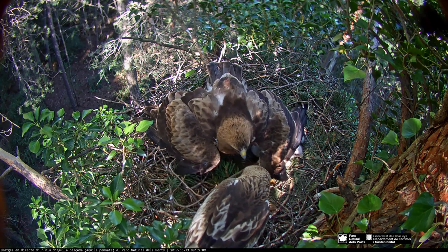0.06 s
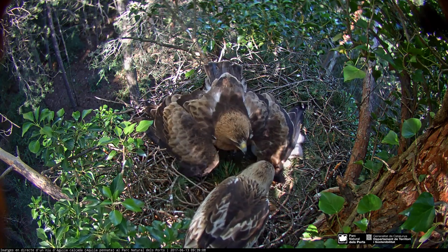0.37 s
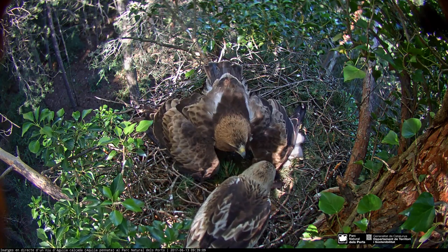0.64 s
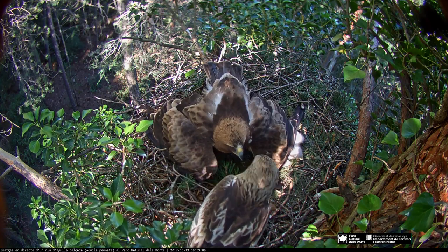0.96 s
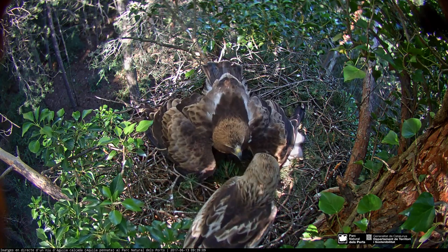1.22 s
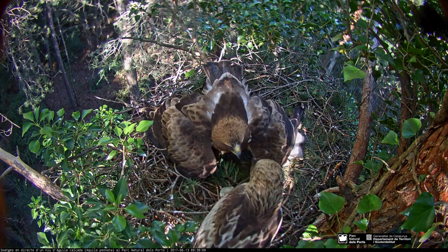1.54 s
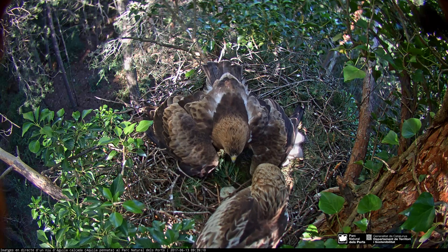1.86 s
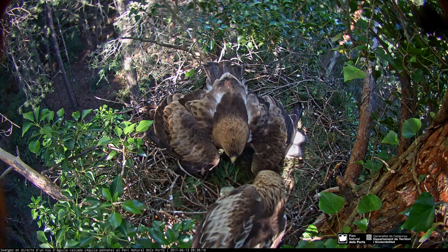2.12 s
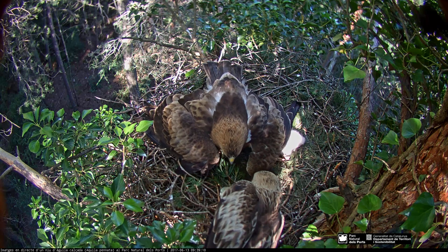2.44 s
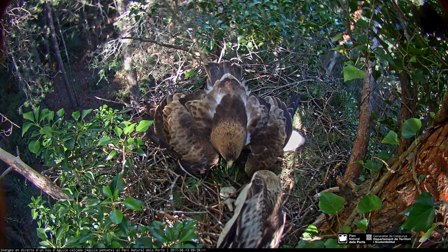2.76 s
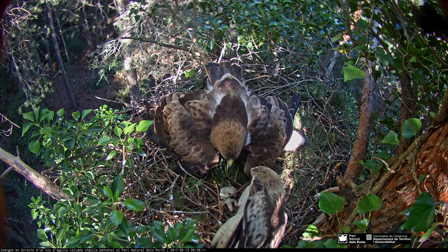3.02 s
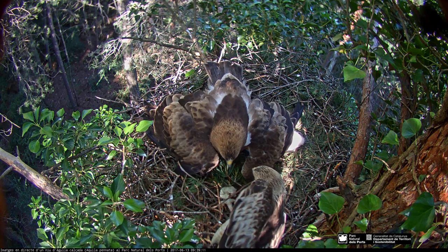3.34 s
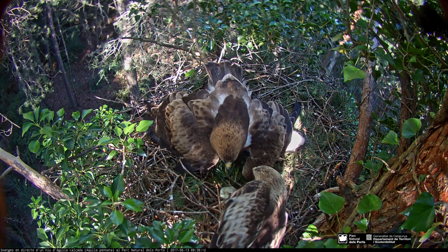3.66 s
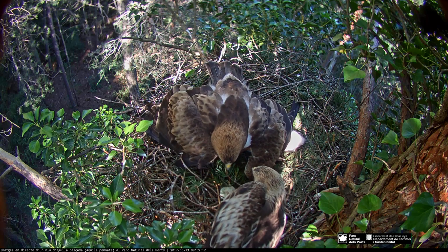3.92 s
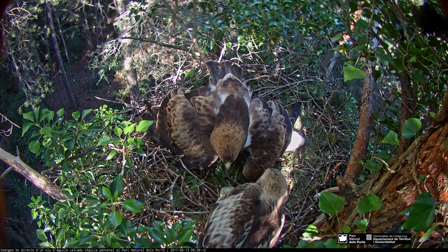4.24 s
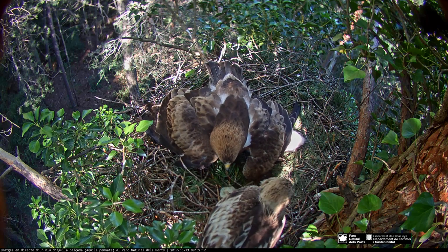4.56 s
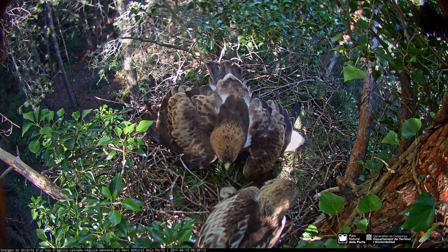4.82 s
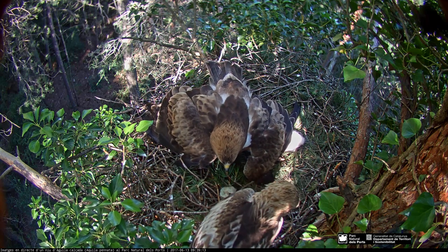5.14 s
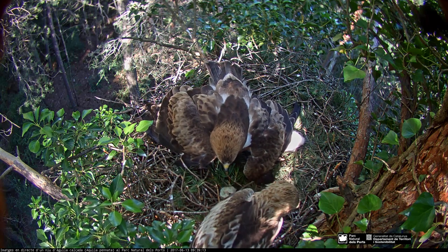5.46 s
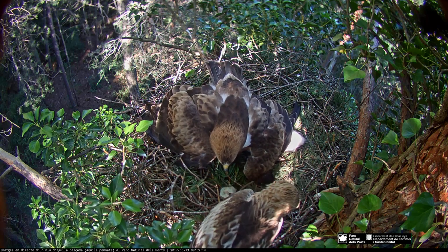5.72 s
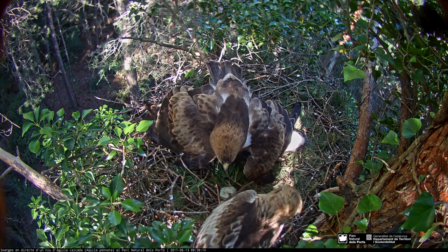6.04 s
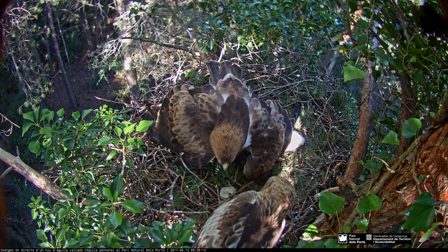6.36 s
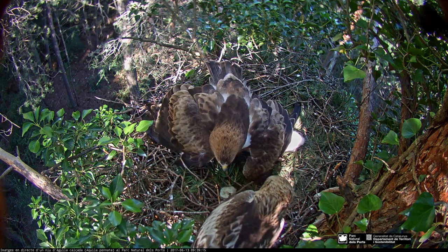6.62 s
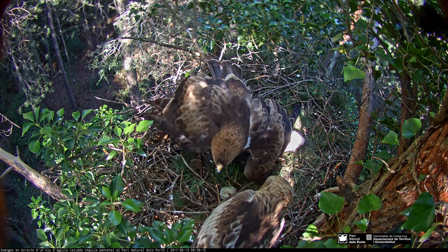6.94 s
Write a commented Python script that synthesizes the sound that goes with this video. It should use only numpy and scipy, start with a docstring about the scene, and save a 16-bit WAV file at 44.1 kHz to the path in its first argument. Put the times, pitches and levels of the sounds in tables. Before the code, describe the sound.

An eagle screams over and over at close range, shrill raspy whistles each ending in a short yelp, over still forest air.

```python
"""An eagle screams repeatedly on its nest in a wood, close to a mono microphone.
Each scream is a rising whistle of the syrinx: it splits into undertones (period doubling) or breaks
into rasp (chaotic vibration), then dives and flips into a low yelp. Pushes of air make two early
screams flutter; the loudest peaks overload the input. Behind: thin far whistles, faint echo, still air."""
import sys
import numpy as np
from scipy import signal
from scipy.fft import rfft, irfft, next_fast_len
from scipy.io import wavfile
from scipy.ndimage import uniform_filter1d

SR = 44100
rng = np.random.default_rng(int(sys.argv[2]) if len(sys.argv) > 2 else 0)


def wav_out(sig):
    """Save sig, one row per channel (or a flat mono array), as 16-bit PCM at SR to the path in sys.argv[1]."""
    wavfile.write(sys.argv[1], SR, np.round(np.clip(np.atleast_2d(sig).T, -1, 1) * 32767).astype(np.int16))


N = 307804
T = np.arange(N) / SR

# still forest air: (f/Hz, relative density/dB)
AIR = [(20, -0.5), (45, -4), (90, -12.5), (170, -19), (350, -20.5), (800, -24), (1500, -24), (3000, -24),
       (5500, -19), (8000, -34)]
# far whistles: (top t/s, rise/s, level/dB)
FAR_WHISTLES = [(2.17, .08, -58.5), (2.575, 0.046, -57), (3.968, 0.068, -50), (4.328, .035, -48.5),
                (5.815, 0.088, -51), (6.182, 0.0547, -47.5)]
# nest rim and trunk: (delay/s, level/dB)
REFLECTIONS = [(.00131, -17.5), (.00291, -26.5), (.00521, -21.5)]
# response of throat and open beak: (f/Hz, gain/dB)
THROAT = [(1000, -32), (2000, -24.5), (2700, -18), (3200, -10.5), (3800, -6), (4500, -2), (5300, 1.33),
          (6200, -6.5), (7000, -9), (7800, -10.5), (8600, -35)]
# yelps after the dives: (t/s, length/s, f/Hz, level/dB)
YELPS = [(0.489, 0.024, 2030, -11), (1.045, 0.036, 2069, -8.5), (1.577, 0.033, 2054, -9.5),
         (2.019, 0.027, 2129, -13.5), (2.501, 0.028, 2085, -13.5), (2.92, 0.045, 2188, -11),
         (3.374, 0.031, 2164, -13), (3.822, 0.027, 2165, -12), (4.268, 0.025, 2128, -13.5),
         (4.696, 0.025, 2160, -12.5), (5.126, 0.03, 2110, -12.5), (5.605, 0.04, 2138, -12),
         (6.061, 0.057, 2127, -11.5), (6.578, 0.032, 2136, -12)]
# short flat peeps of a chick nearby: (t/s, length/s, f/Hz, level/dB)
PEEPS = [(1.997, 0.029, 2220, -37), (2.114, 0.0077, 2350, -53), (3.914, 0.019, 2287, -33.5)]
# low-voice partials: (harmonic number, gain/dB)
YELP_PARTIALS = [(1, -11.5), (2, -0.7), (3, -19), (4, -48.5)]
PEEP_PARTIALS = [(1, 5.3), (2, 3)]
# screams: (t/s, clean opening/s, climb start f/Hz, climb end f/Hz, arch (> 0 climbs early),
# opening level/dB, whistle level/dB, rasp level at break/dB, rasp level at end/dB)
SCREAMS = [(0.094, 0.12, 4560, 6084, 1.52, -29, -17, -26, -19.5),
           (0.646, .011, 5233, 5896, -0.165, -15, -28, -20, -15),
           (1.207, .011, 5000, 5816, -0.12, -20, -38.5, -20.5, -21),
           (1.735, .011, 5150, 5728, -0.8, -18.5, -36.5, -25, -24.5),
           (2.178, .012, 5086, 5672, 0.5, -18, -27.5, -23, -23),
           (2.658, .012, 4989, 6070, -0.041, -19.5, -29, -25, -23.5),
           (3.094, .015, 4880, 5884, 0.049, -23, -25.5, -27, -31),
           (3.528, .019, 4617, 6140, 0.46, -22, -22.5, -25, -34),
           (3.98, 0.024, 4641, 6290, -0.96, -24.5, -26.5, -26, -30.5),
           (4.416, 0.019, 4680, 6312, 0.37, -21.5, -24.5, -29, -32.5),
           (4.853, 0.026, 4400, 5767, 0.7, -23, -24, -31.5, -44),
           (5.307, .038, 4440, 6120, -1.19, -28, -27, -47.5, -39.5),
           (5.786, .038, 4350, 5770, -0.8, -23.5, -27, -40, -43),
           (6.272, .047, 4280, 5770, -0.95, -23.5, -27, -50, -29.5),
           (6.744, 0.038, 4400, 6210, 1.6, -25, -28.5, -27.5, -25)]
# closing dive of each scream: (end t/s, level/dB)
DIVES = [(0.487, -1.5), (1.044, -3), (1.577, -6.5), (2.019, -8), (2.501, -11.5), (2.92, -5), (3.365, -10),
         (3.798, -8.5), (4.252, -4), (4.679, -4.5), (5.111, -11.5), (5.596, -11.5), (6.06, -17),
         (6.564, -13), (7.1, -17)]
# clear, loud swells: (middle t/s, half length/s, f/Hz, level/dB)
SWELLS = [(0.432, .012, 5700, -13), (0.458, .014, 5600, -12), (0.981, 0.004, 5750, -4.5),
          (1.002, .010, 5280, -7.5), (1.017, .008, 5650, -6), (1.556, .007, 5650, -7),
          (1.976, .012, 5450, -12.5), (1.998, 0.00945, 5500, -20.5), (2.479, 0.0077, 5150, -7.5),
          (3.312, .016, 5500, -19), (3.733, 0.0077, 5650, -13.5), (4.218, .008, 5382, -18),
          (4.566, 0.01054, 5650, -21.5), (4.621, 0.012, 5640, -16.5), (5.074, .012, 5500, -22.5)]
# pushes of air: (t/s, length/s, middle f/Hz, level/dB)
PUSHES = [(0.761, 0.038, 5430.0, -8.5), (0.806, 0.034, 5640.0, -9), (0.841, 0.04264, 5850.0, -6),
          (0.885, 0.041, 5770.0, -2.5), (0.929, 0.036, 5770.0, -3), (1.232, 0.047, 5040, -13),
          (1.274, 0.036, 5170.0, -8.5), (1.323, 0.031, 4820.0, -8), (1.369, 0.038, 5340.0, -9),
          (1.416, 0.033, 5380.0, -7.5), (1.459, 0.033, 5680.0, -4), (1.504, 0.041, 5600.0, -7.5)]
# period doubling: (start t/s, end t/s, undertone level/dB)
DOUBLINGS = [(0.139, 0.299, -29.5), (4.975, 5.068, -30), (5.396, 5.521, -30.5), (5.83, 6.023, -32),
             (6.361, 6.513, -31.5)]
# slips into the low register, also period-doubled: (start t/s, end t/s, level/dB)
SLIPS = [(0.678, 0.692, -23.5), (1.770, 1.784, -26), (2.222, 2.24, -27), (2.705, 2.72, -24),
         (3.144, 3.172, -27), (3.549, 3.592, -26.5), (4.003, 4.04, -29), (4.443, 4.512, -26.5),
         (4.897, 4.969, -26.5)]
# second tone below the whistle: (start t/s, end t/s, start f/Hz, level/dB)
SIDE_TONES = [(0.107, 0.157, 3295, -41.5), (0.343, 0.404, 3790, -30), (0.417, 0.475, 4533, -16.5),
              (1.837, 1.904, 3700, -28.5), (2.355, 2.457, 3746, -26), (2.839, 2.878, 3826, -30),
              (3.288, 3.331, 3680, -31.5), (3.677, 3.776, 3800, -30.5), (4.14, 4.231, 3734, -30),
              (4.554, 4.6, 3606, -35), (4.601, 4.662, 4044, -27), (5.057, 5.086, 3940, -28.5),
              (6.918, 6.988, 3900, -36.5)]
# overload crackle: (f/Hz, relative density/dB)
CRACKLE = [(20, -3.5), (100, -1), (250, -3.5), (900, -12.5), (1600, -11), (4000, -37)]


def from_db(db):
    """Decibels to gain."""
    return np.exp(np.asarray(db) * (np.log(10) / 20))


def rms_one(x):
    """Scale to rms 1."""
    return x / np.sqrt(np.mean(x ** 2) + 1e-20)


def gain_at(spectrum, hz):
    """Spectrum gain, interpolated over log frequency."""
    points_hz, db = np.transpose(spectrum)
    return from_db(np.interp(np.log(np.maximum(hz, 1)), np.log(points_hz), db))


def noise(spectrum):
    """Coloured noise, rms 1."""
    size = next_fast_len(N)
    white = rfft(rng.standard_normal(size))
    return rms_one(irfft(white * gain_at(spectrum, np.fft.rfftfreq(size, 1 / SR)), size)[:N])


def drift(rate_hz):
    """Smooth random wander, rms 1."""
    coarse_s = np.arange(0, N + 8, 8) / SR
    lowpass = signal.butter(2, rate_hz, fs=SR / 8, output="sos")
    wander = signal.sosfilt(lowpass, rng.standard_normal(len(coarse_s)))
    return np.interp(T, coarse_s, rms_one(wander))


def gate(t, start, end, edge_s):
    """Unit window, edges rounded inward."""
    return np.sin(np.pi / 2 * np.clip(np.minimum(t - start, end - t) / edge_s, 0, 1)) ** 2


def bell(t, middle, width_s):
    """Gaussian, height 1."""
    return np.exp(-((t - middle) / width_s) ** 2)


def during(start_s, end_s):
    """Sample slice of a time span."""
    return slice(max(int(start_s * SR), 0), int(end_s * SR))


def sine(hz):
    """Sine along a pitch curve, rms 1."""
    return np.sqrt(2) * np.sin(2 * np.pi * np.cumsum(hz) / SR)


def butter(x, order, hz, kind="low"):
    """Butterworth filter."""
    return signal.sosfilt(signal.butter(order, hz, kind, fs=SR, output="sos"), x)


def band_limit(x, hz):
    """Steep elliptic low-pass."""
    return signal.sosfilt(signal.ellip(10, .1, 80, hz, fs=SR, output="sos"), x)


def air(level_db=-56.5):
    """Still forest air: steady, bass-heavy noise."""
    return from_db(level_db) * noise(AIR)


def far_whistles(top_hz=6380, rise_hz_per_s=14000, fall_hz_per_s=48000, fall_s=.072):
    """Faint whistles: slow rise, fast fall."""
    out, waver = np.zeros(N), 1 + .0072 * drift(120)
    for top, rise_s, db in FAR_WHISTLES:
        at = during(top - rise_s, top + fall_s)
        t = T[at]
        hz = top_hz - np.maximum(rise_hz_per_s * (top - t), fall_hz_per_s * (t - top))
        out[at] += sine(hz * waver[at]) * from_db(db) * gate(t, top - rise_s, top + fall_s, .018)
    return out


def forest_echo(x, level_db=-28.5, t60_s=.27, build_s=.0042, dull_hz=5500):
    """Trunks and leaves scatter a thin, dull tail."""
    t = T[:SR]
    tail = rng.standard_normal(SR) * from_db(-60 * t / t60_s) * (1 - np.exp(-t / build_s))
    tail = butter(tail / np.sqrt(np.sum(tail ** 2)), 3, dull_hz)
    return from_db(level_db) * signal.fftconvolve(x, tail)[:N]


def nest(x):
    """Direct sound plus close reflections: level ripples as pitch sweeps."""
    return x + sum(from_db(db) * np.interp(T - round(delay_s * SR) / SR, T, x)
                   for delay_s, db in REFLECTIONS)


def low_notes(notes, partials, fall, fade_db, edge_s, waver):
    """Harmonic notes; pitch and level sag as pressure runs out."""
    out, unsteady = np.zeros(N), 1 + waver * drift(180)
    for start, length, hz, db in notes:
        at = during(start, start + length + edge_s)
        u = np.clip((T[at] - start) / length, 0, None)
        pitch_hz = hz * (1 - fall * np.minimum(u, 1) ** 2.6) * unsteady[at]
        level = from_db(db + fade_db * u ** 5) * gate(T[at], start, start + length + edge_s, edge_s)
        out[at] += level * sum(from_db(part_db) * sine(k * pitch_hz) for k, part_db in partials)
    return out


def bridge_notes(hz=2945, level_db=-24.5, shortest_s=.008):
    """Flat notes from a dive to a late yelp; columns as PEEPS."""
    gaps = [(dive[0], yelp[0] - dive[0]) for dive, yelp in zip(DIVES, YELPS)]
    return [(start, length, hz, level_db) for start, length in gaps if length > shortest_s]


def squeaks(hz=5320, level_db=-14.5, width_s=.0029):
    """Squeak as a bridge note flips into the yelp."""
    out = np.zeros(N)
    for start, length, _, _ in bridge_notes():
        at = during(start, start + 2 * length)
        out[at] += from_db(level_db) * sine(np.full_like(T[at], hz)) * bell(T[at], start + length, width_s)
    return out


def side_tones(pitch_hz, rise_hz_per_s=6000, image_db=-6):
    """A rising lower tone beats with the whistle; a weaker image lies as far above."""
    out = np.zeros(N)
    waver, shimmer = 1 + .02 * drift(140), from_db(.3 * drift(78))
    for start, end, first_hz, db in SIDE_TONES:
        at = during(start, end)
        lower_hz = (first_hz + rise_hz_per_s * (T[at] - start)) * waver[at]
        upper_hz = 2 * pitch_hz[at] - lower_hz
        pair = sine(lower_hz) + from_db(image_db) * sine(upper_hz) * gain_at(THROAT, upper_hz)
        out[at] += from_db(db) * pair * shimmer[at] * gate(T[at], start, end, .0021)
    return out


def cracks(register_db=-29, split_db=-36):
    """Rasp gain: the voice cracks at changes of vibration mode."""
    moments = [(row[0], register_db) for row in YELPS]
    moments += [(t, split_db) for row in DOUBLINGS + SLIPS for t in row[:2]]
    level = np.zeros(N)
    for t, db in moments:
        at = during(t - .01, t + .01)
        level[at] += from_db(db) * bell(T[at], t, .0028)
    return level


def chaos(leap=.069, flicker_db=3.5, turbulence_db=-5, grain_db=-2.1):
    """Rasp, rms 1: three leaping, flickering tones over turbulence."""
    tones = 0
    for centre_hz in (4050, 5100, 6200):
        hz = centre_hz * np.exp(leap * drift(150) + .04 * drift(900))
        tones += sine(hz) * gain_at(THROAT, hz) * from_db(flicker_db * drift(180))
    turbulence = from_db(turbulence_db) * noise(THROAT)
    return rms_one((rms_one(tones) + turbulence) * from_db(grain_db * drift(180)))


def undertones(pitch_hz, slip_db=-1):
    """Period doubling: lines at 0.5 and 1.5 times the pitch, plus their gate."""
    level, doubled = np.zeros(N), np.zeros(N)
    for start, end, db in DOUBLINGS + [(start, end, db + slip_db) for start, end, db in SLIPS]:
        at = during(start, end)
        doubled[at] = gate(T[at], start, end, .003)
        level[at] = from_db(db) * doubled[at]
    lines = sum(sine(hz) * gain_at(THROAT, hz) for hz in (.5 * pitch_hz, 1.5 * pitch_hz))
    return level * lines, doubled


def slip(pitch_hz, whistle, low_hz=4160, rise_hz_per_s=3600):
    """Low register: the whistle drops to a slowly rising pitch. In place."""
    for start, end, db in SLIPS:
        at = during(start, end)
        held = gate(T[at], start, end, .002)
        pitch_hz[at] += (low_hz + rise_hz_per_s * (T[at] - start) - pitch_hz[at]) * held
        whistle[at] += (from_db(db) - whistle[at]) * held


def swell(pitch_hz, whistle, rasp, rasp_db=-4.5):
    """The whistle settles on one pitch and grows; rasp eases. In place."""
    for middle, width_s, hz, db in SWELLS:
        start, end = middle - 2 * width_s, middle + 2 * width_s
        at = during(start, end)
        hump = bell(T[at], middle, width_s)
        pitch_hz[at] += (hz - pitch_hz[at]) * gate(T[at], start, end, 2 * width_s)
        whistle[at] += from_db(db) * hump
        rasp[at] *= from_db(rasp_db * hump)


def flutter(pitch_hz, whistle, rasp, gap_db=-14, flank_db=-28, rasp_db=-15, split_db=-8, mirror_db=-18):
    """Air pushes arch, swell and split the whistle, in place. Returns a mirrored tone on the flanks."""
    pushing = np.zeros(N)
    for start, length, _, _ in PUSHES:
        span_s = start - .012, start + length + .012
        at = during(*span_s)
        pushing[at] += gate(T[at], *span_s, .008)
    rasp *= from_db(gap_db * np.minimum(pushing, 1))
    mirrored = np.zeros(N)
    for start, length, hz, db in PUSHES:
        at = during(start, start + length)
        u = np.abs(2 * (T[at] - start) / length - 1)   # 0 at the middle, 1 at the ends
        window = gate(T[at], start, start + length, .007)
        flanks = np.sin(np.pi * u) ** 2
        split = bell(T[at], start + .74 * length, .0013)
        pitch_hz[at] = hz * np.interp(u, [0, .2, .38, .42, .65, 1], [1, 1.01, 1.05, .95, .86, .6])
        whistle[at] += from_db(db + flank_db * u ** 2) * window * (1 - split)
        push_rasp = from_db(db + rasp_db) * window * (.25 + flanks) + from_db(db + split_db) * split
        rasp[at] = np.hypot(rasp[at], push_rasp)
        mirrored[at] = sine(hz * (1 + .36 * u ** 1.5)) * from_db(db + mirror_db) * flanks * window
    return mirrored


def scream_controls(rest_hz=3387, scoop_s=.0095, dive_s=.012, break_s=.0079,
                    crescendo_db=5, build_db=-27.5, hoarse_db=-30.5):
    """Pitch, whistle gain, rasp gain: clean scoop, break, climb, loud dive with a hoarse foot."""
    pitch_hz, whistle, rasp = np.full(N, float(rest_hz)), np.zeros(N), np.zeros(N)
    for scream, (end, dive_db) in zip(SCREAMS, DIVES):
        start, opening_s, first_hz, last_hz, arch, opening_db, whistle_db, *rasp_db = scream
        break_at = start + opening_s
        at = during(start, end)
        t = T[at]
        u = (t - start) / (end - start)
        climb_hz = first_hz + (last_hz - first_hz) * (u + arch * u * (1 - u))
        tension = (1 - np.exp((start - t) / scoop_s)) * (1 - np.exp((t - end) / dive_s))
        pitch_hz[at] = rest_hz + (climb_hz - rest_hz) * tension
        broken = np.clip((t - break_at) / break_s + .5, 0, 1)
        body = from_db(opening_db * (1 - broken) + (whistle_db + crescendo_db * u) * broken)
        build = from_db(build_db) * bell(t, end - .023, .0135)
        burst = from_db(dive_db) * bell(t, end - .0115, .006)
        whistle[at] = (body + build + burst) * gate(t, start, end, .0038)
        rasp[at] = from_db(np.interp(t, [break_at, end], rasp_db)) * broken * gate(t, start, end, .0088)
        rasp[at] += from_db(hoarse_db) * bell(t, end - .004, .003)
    return pitch_hz, whistle, rasp


def screams(stick_hz=46, spacing_hz=421, jitter=.0318, shimmer_db=2, octave_db=-33, doubled_rasp_db=-4):
    """The whistle staggers as rasp takes over; period doubling steadies it and eases the rasp."""
    pitch_hz, whistle, rasp = scream_controls()
    swell(pitch_hz, whistle, rasp)
    mirrored = flutter(pitch_hz, whistle, rasp)
    slip(pitch_hz, whistle)
    rough = rasp ** 2 / (rasp ** 2 + whistle ** 2 + 1e-12)
    wobble = (.002 + .022 * np.sqrt(rough)) * drift(45)
    pitch_hz *= 1 + wobble + .0091 * drift(140)
    pitch_hz += stick_hz * np.sin(2 * np.pi * pitch_hz / spacing_hz)   # clings to windpipe resonances
    halves, doubled = undertones(pitch_hz)
    stagger = .11 * rough ** 1.4 * drift(130) + jitter * rough * drift(750)
    unsteady_hz = pitch_hz * (1 + (1 - doubled) * stagger)
    dropouts_db = 5 * rough ** .6 * (1 - doubled) * (drift(90) - .9)
    flicker = from_db(shimmer_db * np.sqrt(rough) * drift(130) + dropouts_db)
    tone = whistle * flicker * (sine(unsteady_hz) + from_db(octave_db) * sine(2 * unsteady_hz))
    hoarse = (rasp * from_db(doubled_rasp_db * doubled) + cracks()) * chaos()
    return tone + hoarse + halves + mirrored + side_tones(pitch_hz)


def scene():
    """Eagle with a peeping chick, echo, far whistles, air; dual mono."""
    yelps = low_notes(YELPS, YELP_PARTIALS, fall=.17, fade_db=-18, edge_s=.0041, waver=.009)
    peeps = low_notes(PEEPS + bridge_notes(), PEEP_PARTIALS,
                      fall=.0051, fade_db=-1.6, edge_s=.0031, waver=.014)
    voices = screams() + yelps + peeps + squeaks()
    mono = nest(voices) + forest_echo(voices) + far_whistles() + air()
    return np.array([mono, mono])


def record(dry, clip_level=.563, asymmetry=.1, crackle_db=-36, dc_offset=.018,
           dull_hz=7400, mic_top_hz=8800, sampling_hz=16000, alias_db=-1, cutoff_hz=15800):
    """Overloaded input: uneven soft clip, crackle on peaks, treble loss, offset, aliasing, hard clip."""
    fine = signal.resample_poly(dry[0], 4, 1)
    limit = clip_level * (1 + asymmetry * np.sign(fine))
    clipped, loud = fine.copy(), np.abs(fine) > clip_level / 2
    clipped[loud] /= (1 + (fine[loud] / limit[loud]) ** 8) ** (1 / 8)
    overload = uniform_filter1d(np.tanh(np.abs(fine - clipped)[::4] / .04), size=80)
    mono = signal.resample_poly(clipped, 1, 4) + from_db(crackle_db) * overload * noise(CRACKLE)
    mono = band_limit(butter(mono, 6, dull_hz), mic_top_hz) + dc_offset
    treble = butter(mono, 12, sampling_hz / 2, "high")
    alias = from_db(alias_db) * treble * 2 * np.cos(2 * np.pi * sampling_hz * T)
    mono = band_limit(mono + alias, mic_top_hz)
    mono = band_limit(np.clip(mono, -.73, .73), cutoff_hz)
    return np.array([mono, mono])


dry = scene()
out = record(dry)
wav_out(out)
```